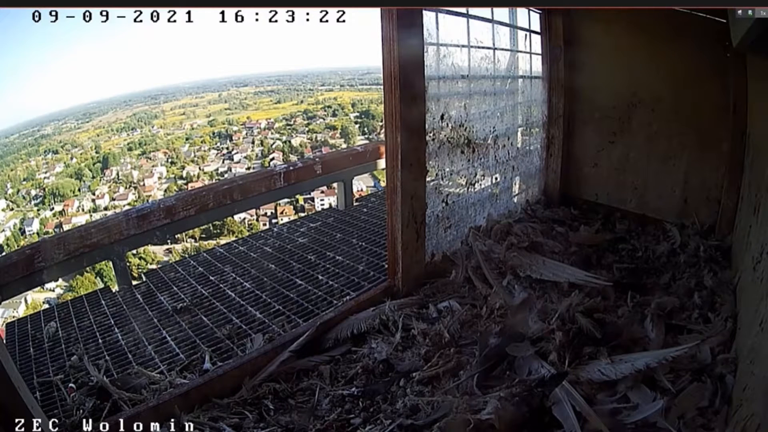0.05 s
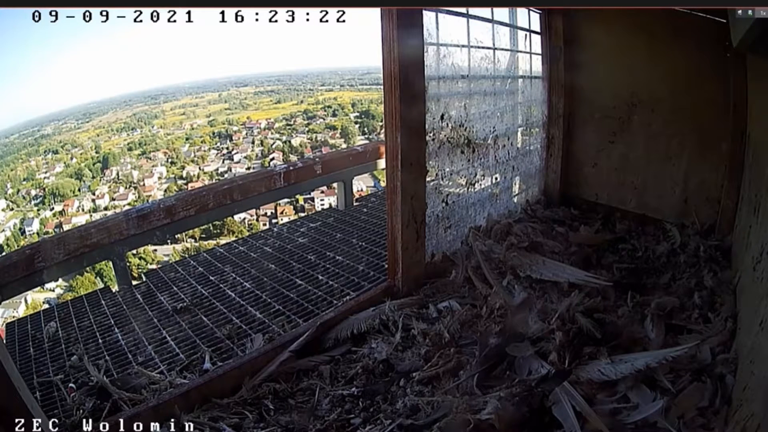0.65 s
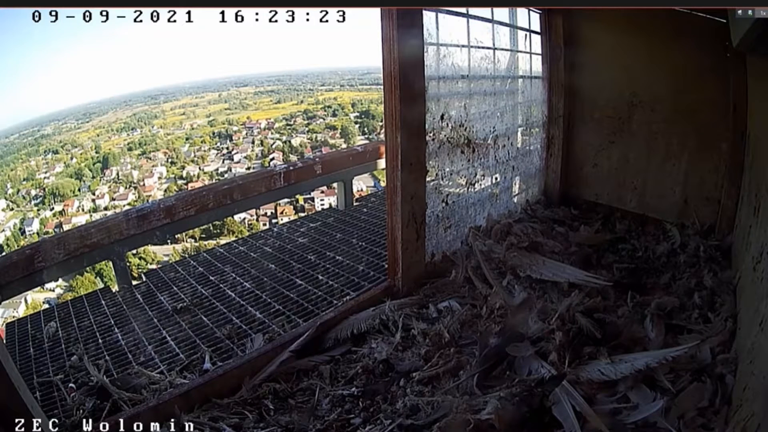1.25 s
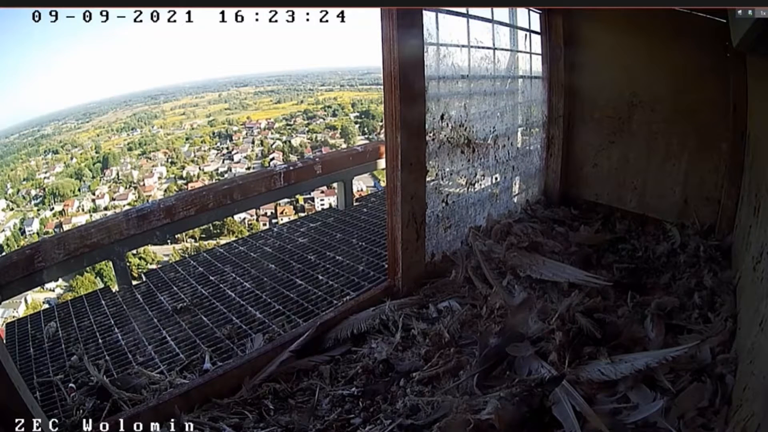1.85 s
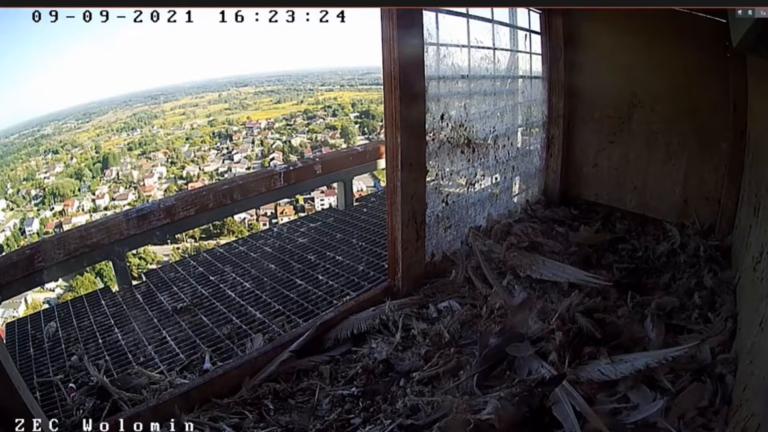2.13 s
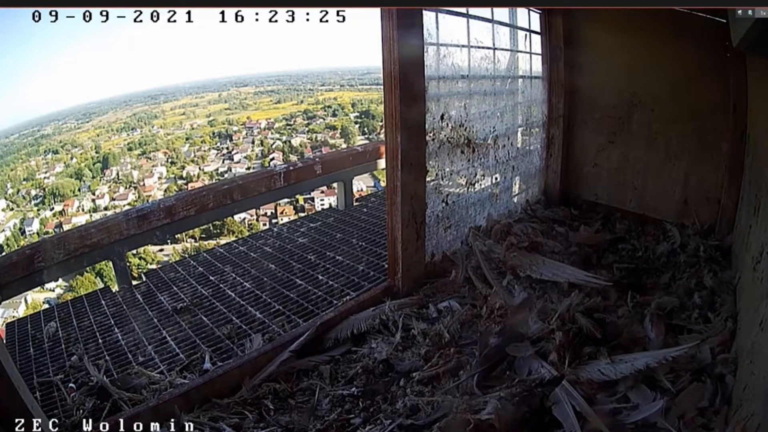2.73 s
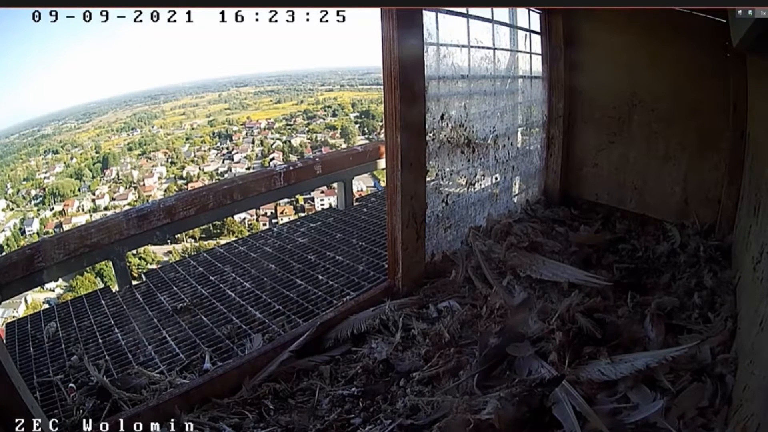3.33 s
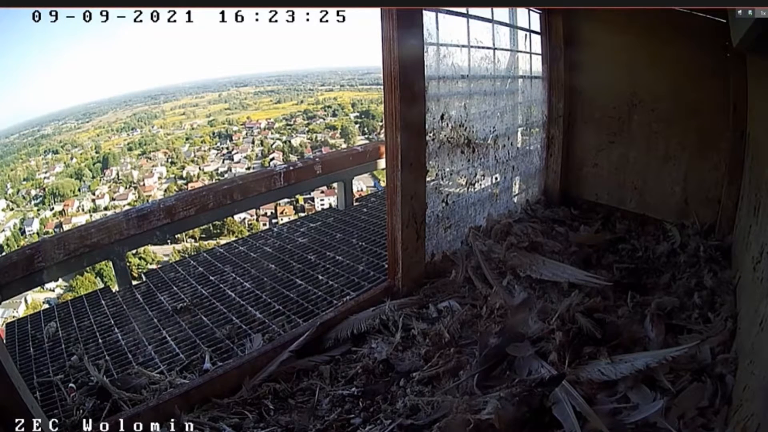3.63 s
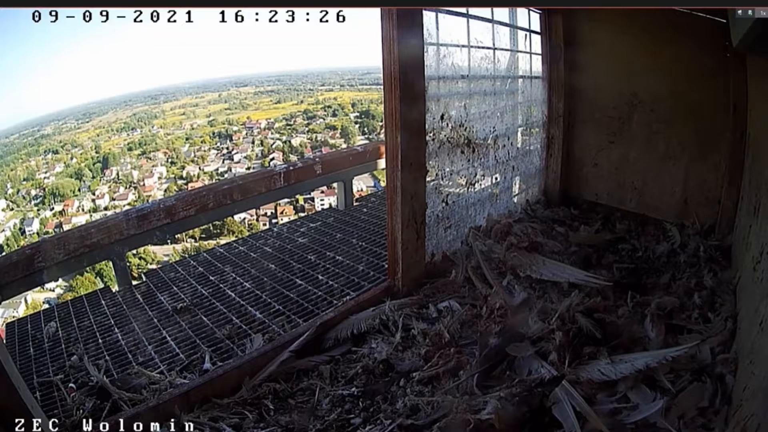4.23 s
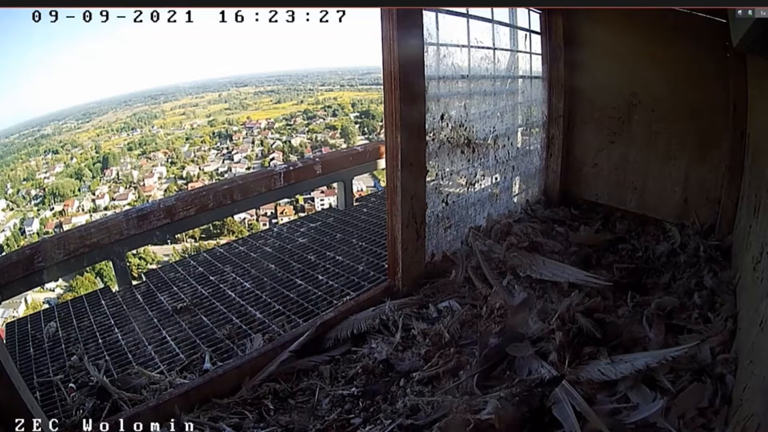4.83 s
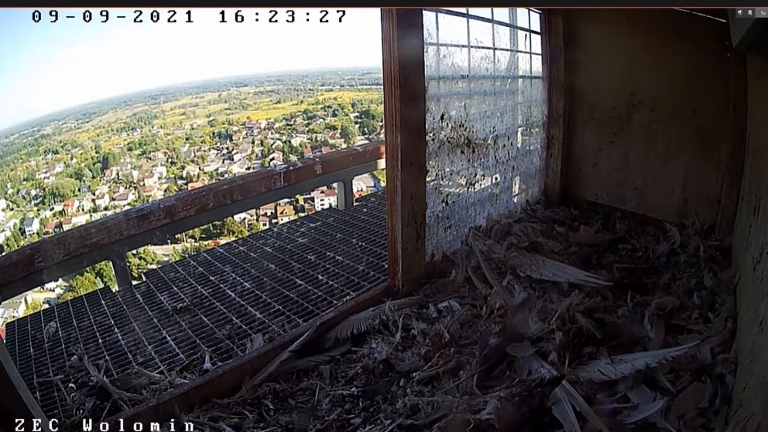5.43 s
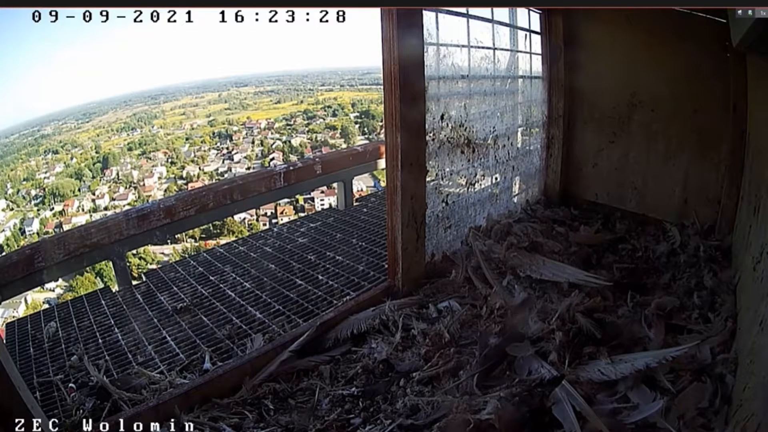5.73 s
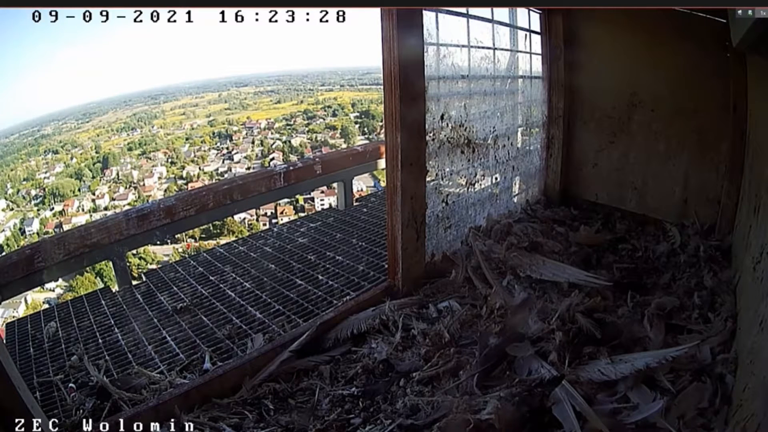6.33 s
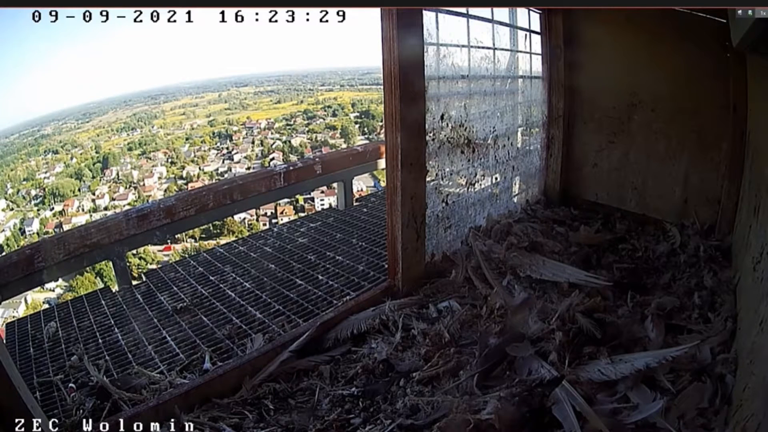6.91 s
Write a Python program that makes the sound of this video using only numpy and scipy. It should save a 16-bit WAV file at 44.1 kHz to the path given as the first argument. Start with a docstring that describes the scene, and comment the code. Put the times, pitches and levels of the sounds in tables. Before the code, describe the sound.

Outdoor air hums and hisses faintly throughout in a nest box high on a tower, swelling softly around 1.3 and 4.4 seconds. A falcon gives a thin squeak running into a sharp whistled chup right at the start, and chups again at about 2.2, 3.0, 3.9, 4.7 and 5.8 seconds. Between these come quieter pairs of quick, hoarse clucks, at about 0.9, 1.9, 2.6, 3.5, 4.5, 5.1 and 6.3 seconds. A dry beak snap clicks at 2.9 seconds, and a short flurry of harsh rasps starts at 4.3 seconds. Every note is very brief, echoes lightly off the box and nearby walls, and is trailed by a dull low rumble from the camera. The sound is almost mono, through a telephone-like microphone that cuts the treble and adds a thin metallic sheen.

```python
"""Outdoor air hums faintly in a nest box high on a tower. A falcon's voice box whistles a sharp "ee-chup";
the camera adds a dull low rumble after each note, and the box and walls echo the calls. Near 0.9 s come
two hoarse clucks, pulses ringing in throat and beak; the two calls then take turns. A beak snaps at 2.9 s,
and a flurry of rasps starts at 4.3 s. All along, the narrow-band camera microphone cuts the treble, and
its uneven sample clock adds a thin metallic sheen."""
import sys
import numpy as np
from scipy import signal
from scipy.fft import rfft, irfft, next_fast_len
from scipy.io import wavfile
from scipy.ndimage import map_coordinates

SR = 44100
rng = np.random.default_rng(int(sys.argv[2]) if len(sys.argv) > 2 else 0)


def to_wav(sig):
    """Store sig (one row per channel, or 1-D mono) as 16-bit WAV at the path in sys.argv[1].

    Samples outside -1..1 are clipped; the rate is SR.
    """
    pcm = np.clip(np.atleast_2d(sig), -1, 1) * 32767
    pcm = np.round(pcm).astype(np.int16)
    wavfile.write(sys.argv[1], SR, pcm.T)  # frames by channels


N = 307377

# tone colour of the outdoor hiss: (frequency [Hz], gain [dB])
HISS_COLOUR = [(30, -40), (48, -10), (80, -4.5), (150, -14.5), (249, -23), (300, -10.5), (424, -12),
               (663, -5), (847, -8.5), (1220, -19), (1440, -28), (1730, -18), (2150, -19), (2350, -25),
               (2700, -19.5), (3520, -16), (3900, -20), (5070, -48.5)]
# tones at which the box hums: (frequency [Hz], width [Hz], gain [dB])
BOX_RESONANCES = [(98, 10, -7), (156.5, 30, -11.5), (322, 10, -10.5), (560, 25, -5), (686, 37, -5),
                  (824.4, 61, 2), (916, 15, -5), (1202.5, 70, -7)]
# soft gusts: (peak time [s], half width [s], hum rise [dB], hiss rise [dB])
GUSTS = [(1.28, 0.24, 7, 3), (4.4, 1, 0.5, 3.5)]
# thin "ee" squeaks, and two faint high rustles at 0.4 s and 4.3 s:
# (time [s], length [s], top pitch [Hz], level [dB])
SQUEAKS_AND_RUSTLES = [(0.123, 0.034, 3790, -46), (0.413, 0.02, 3452, -67), (2.179, 0.033, 3914, -50.5),
                       (3.842, 0.022, 3780, -51), (4.293, 0.027, 3450, -57.5), (4.691, 0.031, 3763, -44),
                       (5.724, 0.032, 3574, -37.5)]
# sharp "chups": (time [s], high length [s], low length [s], high pitch [Hz], low pitch [Hz], level [dB])
CHUPS = [(0.161, 0.017, 0.021, 3064, 2086, -25), (2.213, 0.015, 0.022, 3198, 2110, -30.5),
         (2.963, 0.018, 0.028, 3106, 2110, -30), (3.874, 0.017, 0.01, 3217, 2099, -27),
         (4.729, 0.015, 0.017, 3019, 2084, -27), (5.76, 0.0089, 0.026, 2994, 2027, -34.5)]
# tone colour of the camera's rumble: (frequency [Hz], gain [dB])
RUMBLE_COLOUR = [(25, -45.5), (45, -14), (70, 1), (120, 1), (250, -8.5), (450, -9.5), (800, -9),
                 (1400, -21), (4000, -17.5)]
# echoes from nearby walls: (delay [s], gain [dB])
WALL_ECHOES = [(0.038, -23.5), (.046, -29.5), (0.078, -32.5), (.098, -29.5)]
# ring of the box and tower: (frequency [Hz], time to fade by 60 dB before stretching [s])
RING_TIMES = [(100, .36), (480, .28), (800, .36), (2000, .2), (3500, .2)]
# what the box and walls give back of a call: (frequency [Hz], gain [dB])
ECHO_COLOUR = [(70, 2), (130, -2), (250, -3), (300, 4), (450, -1), (800, 0.5), (1700, 3.5), (2150, 2.5),
               (3050, -5), (3700, 1)]
# stereo width of the ring and air: (frequency [Hz], side gain [dB])
STEREO_WIDTH = [(60, -33), (130, -23.5), (300, -12.5), (1200, -9), (2500, -15)]
# pairs of clucks: (time [s], delay of the second [s], length of the first [s], pitch [Hz],
# beak resonance [Hz], throat level [dB], beak level [dB])
CLUCK_PAIRS = [(0.906, .064, .04, 465.7, 3126, -38.5, -39), (1.912, .06, .038, 468.5, 3170, -37.5, -39),
               (2.617, .066, .034, 498.6, 3263, -40.5, -39), (3.458, .075, .028, 478, 3118, -44, -38.5),
               (4.473, .064, .05, 492.4, 3183, -42, -39), (5.142, .07, .043, 482.4, 3100, -45, -41),
               (6.331, .077, .043, 493.5, 3128, -45.5, -41.5)]
# harmonics of the hoarse voice: (frequency [times the pitch], level [dB])
HARMONICS = [(1, 0), (2, 2), (3, -1.5), (4, 0), (5, -1.5), (6, 1), (7, 0), (8, -3), (9, -2)]
# tones the throat favours: (frequency [Hz], width [Hz], gain [dB])
THROAT_RESONANCES = [(321.8, 90, -1), (487, 260, 7), (718, 130, 3.5), (884, 150, 3.5)]
# tones the beak favours: (frequency [times the note's beak resonance], width [Hz], gain [dB])
BEAK_RESONANCES = [(0.619, 400, -5), (0.96, 620, 4), (1.12, 480, -1)]
# dry snap of the beak: (time [s], peak level [dB])
BEAK_SNAPS = [(2.9287, -23)]
# harsh rasps: (time [s], length [s], throat level [dB], beak level [dB], loudest point [share of length])
RASPS = [(4.316, .028, -34.5, -43.5, .3), (4.371, 0.072, -46, -48, .2), (4.429, 0.03, -48.5, -43, .7),
         (4.512, 0.04, -39, -47, .2)]
# tone colour of the metallic sheen: (frequency [Hz], gain [dB])
SHEEN_COLOUR = [(700, 2.5), (3500, -1.5), (4700, -1.5), (7000, 4), (11000, 6.5), (14500, 1.5),
                (15800, -1.5)]

HUM_DB, HISS_DB, CALM_DB_PER_S = -70.5, -71.5, 0.39  # the air slowly dies down from these levels
LOW_TONE_DB, CHUP_RASP_DB = -3.5, -4.5  # added to a chup's level
BASS_CUT_HZ, MIC_TOP_HZ, CLOCK_SLIP_HZ, SHEEN_TOP_HZ = 41.7, 3930, 3900, 16000


def amp(db):
    """Turn decibels into a gain."""
    return 10 ** (np.asarray(db) / 20)


def unit(x):
    """Scale x to an average strength (rms) of 1."""
    return x / np.sqrt(np.mean(x ** 2) + 1e-20)


def along(points, hz):
    """Read between (frequency, value) points on a log frequency axis."""
    f, v = np.transpose(points)
    return np.interp(np.log(hz + 1), np.log(f + 1), v)


def wobble(rate, size):
    """A smooth curve through `rate` random values a second."""
    return map_coordinates(rng.standard_normal(int(size * rate / SR) + 4), [np.arange(size) * rate / SR])


def filtered(x, response):
    """Multiply each frequency f in x by response(f)."""
    size = x.shape[-1]
    padded = next_fast_len(size + SR // 10)
    return irfft(rfft(x, padded) * response(np.fft.rfftfreq(padded, 1 / SR)), padded)[..., :size]


def coloured(x, colour):
    """Shape x with a (frequency, gain) table."""
    return filtered(x, lambda f: amp(along(colour, f)))


def resonance(hz, width, f):
    """How something that rings at hz responds to frequency f."""
    return 1j * f * width / (hz * hz - f * f + 1j * f * width)


def peaks(resonances, f):
    """The gain of several steep-sided resonances together."""
    return sum(amp(db) * np.abs(resonance(hz, width, f)) ** 2 for hz, width, db in resonances)


def noise_band(hz, width, size):
    """Husky noise centred on hz."""
    return unit(filtered(rng.standard_normal(size), lambda f: resonance(hz, width, f) ** 2))


def add(track, time, sound):
    """Mix a sound into the track at a time in seconds."""
    part = track[round(time * SR):][:len(sound)]
    part += sound[:len(part)]


def gate(t, length, attack, release):
    """A note opens over the attack and dies away after its length."""
    return np.sin(np.pi / 2 * np.clip(t / attack, 0, 1)) ** 2 * np.exp(-np.maximum(t - length, 0) / release)


def air():
    """Outdoor air hisses softly and hums in the box; both swell in the gusts."""
    t = np.arange(N) / SR
    hum_db, hiss_db = HUM_DB - CALM_DB_PER_S * t, HISS_DB - CALM_DB_PER_S * t
    for time, width, hum_rise_db, hiss_rise_db in GUSTS:
        gust = np.exp(-((t - time) / width) ** 2)
        hum_db += hum_rise_db * gust
        hiss_db += hiss_rise_db * gust
    hum = unit(filtered(rng.standard_normal(N), lambda f: peaks(BOX_RESONANCES, f)))
    hum *= amp(hum_db + 3.3 * wobble(5.4, N))
    hiss = unit(coloured(rng.standard_normal(N), HISS_COLOUR))
    hiss *= amp(hiss_db + 0.47 * wobble(4.9, N))
    return hum + hiss


def whistle(pitch, jitter, flutter_db=2.0):
    """A nearly pure tone, unsteady in pitch and strength."""
    size = len(pitch)
    phase = 2 * np.pi * np.cumsum(pitch * (1 + jitter * wobble(700, size))) / SR
    return np.sqrt(2) * np.sin(phase) * amp(flutter_db * wobble(300, size))


def squeaks_and_rustles():
    """The bird's thin "ee" and two faint rustles: each a rising, husky tone that peaks early and fades."""
    out, t = np.zeros(N), np.arange(SR // 10) / SR
    for time, length, top_hz, db in SQUEAKS_AND_RUSTLES:
        pitch = top_hz * np.interp(t, [0, .42 * length], [.946, 1])
        fade = amp(db + 1 - 15 * np.abs(t / length - .27)) * gate(t, length, attack=.0053, release=.003)
        husk = amp(-14) * noise_band(hz=3640, width=1100, size=len(t))
        add(out, time, fade * (whistle(pitch, jitter=.022) + husk))
    return out


def chups():
    """A loud high tone swells and slides down, then the voice box jumps to a low tone and rasps."""
    out, t = np.zeros(N), np.arange(SR // 10) / SR
    for time, high_s, low_s, high_hz, low_hz, db in CHUPS:
        high = whistle(high_hz * (1 + .15 * np.exp(-t / .005)), jitter=.016)
        swell = amp(6 - 16 * np.abs(t / high_s - .61)) * gate(t, high_s, attack=.003, release=.002)
        add(out, time, amp(db) * high * swell)
        low = whistle(low_hz * (1 + .076 * np.exp(-t / .0042)), jitter=.0046)
        fade = amp(4 - 6 * t / low_s) * gate(t, low_s, attack=.006, release=.004)
        add(out, time + high_s - .004, amp(db + LOW_TONE_DB) * low * fade)
        rasp = noise_band(hz=3213, width=1100, size=len(t))
        burst = gate(t, .008, attack=.006, release=.011)
        add(out, time + high_s - .008, amp(db + CHUP_RASP_DB) * rasp * burst)
    return out


def camera_rumble(calls):
    """The camera adds a dull low rumble after each note; it grows more slowly than the note's strength."""
    t = np.arange(SR // 5) / SR
    lag = t * np.exp(-t / .008)
    strength = np.abs(signal.fftconvolve(np.abs(calls), lag / lag.sum())[:N])
    swell = amp(-20.5) * strength ** .72 * unit(coloured(rng.standard_normal(N), RUMBLE_COLOUR))
    delay_s, corner_hz = .016, 300  # the deepest part arrives last
    return filtered(swell, lambda f: np.exp(-2j * np.pi * delay_s * corner_hz * (1 - np.exp(-f / corner_hz))))


def wall_echoes(x):
    """Each wall sends back a late, quiet copy of the calls."""
    return filtered(x, lambda f: sum(amp(db) * np.exp(-2j * np.pi * f * s) for s, db in WALL_ECHOES))


def tower_ring(x, stretch):
    """Box and tower ring on in two tails (middle, side) that fade ever faster as the sound escapes."""
    out, block = np.zeros((2, N + SR)), SR // 2
    for start in range(0, N, block):  # new tails as the birds shift about
        hz, t, spectrum = signal.stft(rng.standard_normal((2, block)), SR, nperseg=256)
        age = t / (stretch * along(RING_TIMES, hz)[:, None])
        tails = signal.istft(spectrum * amp(-60 * age ** 1.4), SR, nperseg=256)[1][:, :block]
        tails /= np.linalg.norm(tails[0])
        ringing = signal.fftconvolve(x[None, start:start + block], tails, axes=1)
        out[:, start:start + ringing.shape[1]] += ringing
    return out[:, :N]


def hoarse_note(length, pitch_hz, beak_hz, throat_db, beak_db, glide, crest, rough):
    """Uneven pulses and pulsing noise ring the throat and, more briefly, the open beak."""
    # glide: first and last pitch [times pitch_hz]; crest: loudest point [0-1]; rough: share of noise
    t = np.arange(SR // 10) / SR
    pitch = pitch_hz * np.interp(t, [0, length], glide) * (1 + .067 * rough * wobble(400, len(t)))
    phase = 2 * np.pi * np.cumsum(pitch) / SR
    # the windpipe smears each pulse, so the harmonics are out of step
    pulses = unit(sum(amp(db) * np.cos(k * phase + rng.uniform(0, 2 * np.pi)) for k, db in HARMONICS))
    noise = filtered(rng.standard_normal(len(t)), lambda f: f < MIC_TOP_HZ)
    rasp = unit((1 + .7 * np.cos(phase)) * noise)
    source = np.sqrt(1 - rough) * pulses + np.sqrt(rough) * rasp
    source *= amp(2.5 * rough * wobble(250, len(t)))
    opening = gate(t, length, attack=.005, release=.004)
    beak = [(ratio * beak_hz, width, db) for ratio, width, db in BEAK_RESONANCES]
    note = np.zeros(len(t))
    # the throat speaks a little longer and later than the beak
    for resonances, db, lag, arch_db in (THROAT_RESONANCES, throat_db, .08, 20), (beak, beak_db, -.02, 32):
        swell = opening * amp(-arch_db * (t / length - crest - lag) ** 2)
        voice = swell * filtered(source, lambda f: peaks(resonances, f))
        note += amp(db) * unit(voice) * np.sqrt(length / t[-1])
    return note


def clucks():
    """Pairs of hoarse notes: a soft, rough one rises, then a stronger, clearer one falls."""
    out = np.zeros(N)
    for time, delay, first_s, pitch_hz, beak_hz, throat_db, beak_db in CLUCK_PAIRS:
        add(out, time, hoarse_note(first_s, pitch_hz, beak_hz, throat_db - 4, beak_db - 2.5,
                                   glide=(.76, 1.01), crest=.62, rough=.52))
        add(out, time + delay, hoarse_note(.044, pitch_hz, beak_hz, throat_db, beak_db,
                                           glide=(1.07, .94), crest=.4, rough=.26))
    return out


def beak_snap():
    """The beak snaps shut with a tiny, brief ring; a soft sinking thud follows."""
    out, t = np.zeros(N), np.arange(SR // 15) / SR
    for time, db in BEAK_SNAPS:
        click = np.sin(2 * np.pi * 3150 * t) * gate(t, .0013, attack=.00075, release=.00013)
        add(out, time, amp(db) * click)
        thud_hz = 60 + 260 * np.exp(-t / .0067)
        thud = np.sin(2 * np.pi * np.cumsum(thud_hz) / SR) * gate(t, .0092, attack=.0063, release=.01)
        add(out, time + .0026, amp(db - 22) * thud)
    return out


def rasps():
    """A flurry of harsh notes, mostly noise, on a nearly level pitch."""
    out = np.zeros(N)
    for time, length, throat_db, beak_db, crest in RASPS:
        add(out, time, hoarse_note(length, pitch_hz=332, beak_hz=3200, throat_db=throat_db,
                                   beak_db=beak_db, glide=(.99, .98), crest=crest, rough=.92))
    return out


def scene():
    """Calls, rumble, echoes and ringing over the air, almost mono; the hoarse notes linger longer."""
    sharp = squeaks_and_rustles() + chups() + beak_snap()
    hoarse = clucks() + rasps()
    rumble = camera_rumble(sharp + amp(2) * hoarse)
    direct = sharp + hoarse + rumble
    sharp_ring = amp(-13.5) * tower_ring(sharp + rumble, stretch=1)
    hoarse_ring = amp(-14) * tower_ring(hoarse, stretch=1.45)
    mid_ring, side_ring = sharp_ring + hoarse_ring
    mid = direct + coloured(wall_echoes(direct) + mid_ring, ECHO_COLOUR) + air()
    side = coloured(amp(5.5) * side_ring + amp(-7) * air(), STEREO_WIDTH)
    return np.array([mid + side, mid - side])


def record(dry):
    """A telephone-like microphone; its clock slips, which mirrors the sound faintly up into the treble."""
    dry = signal.sosfilt(signal.butter(4, BASS_CUT_HZ, "highpass", fs=SR, output="sos"), dry)
    narrow = filtered(dry, lambda f: 1 / np.sqrt(1 + (f / MIC_TOP_HZ) ** 140))
    slip = (np.arange(N) * CLOCK_SLIP_HZ / SR) % 1 - .5  # sawtooth timing error [samples]
    slope = filtered(narrow, lambda f: 2j * np.pi * f / SR)  # change per sample
    sheen = coloured(slip * slope, SHEEN_COLOUR)
    return filtered(narrow + sheen, lambda f: f < SHEEN_TOP_HZ)


dry = scene()
out = record(dry)
to_wav(out)
```